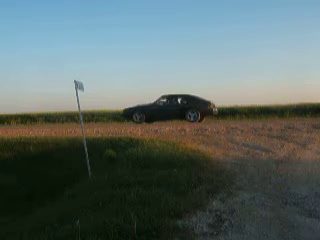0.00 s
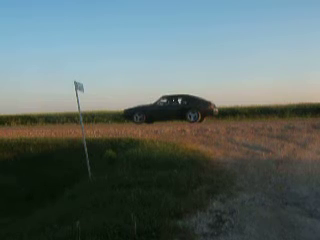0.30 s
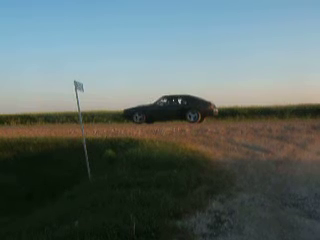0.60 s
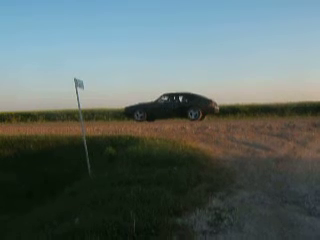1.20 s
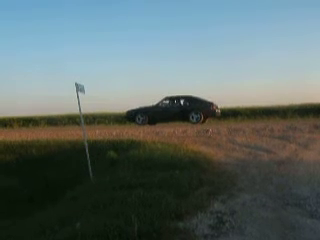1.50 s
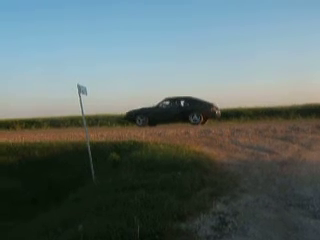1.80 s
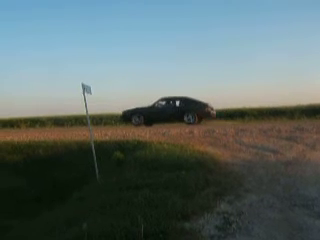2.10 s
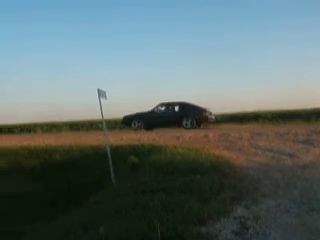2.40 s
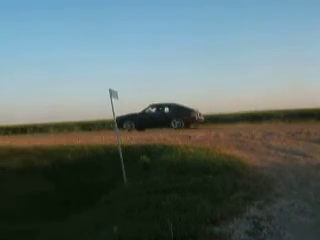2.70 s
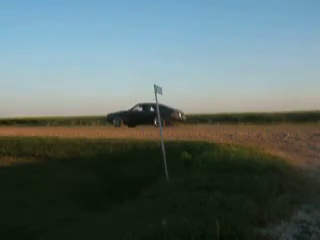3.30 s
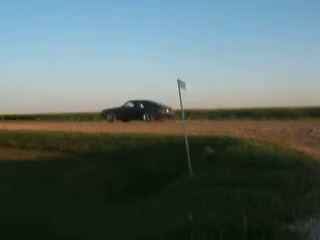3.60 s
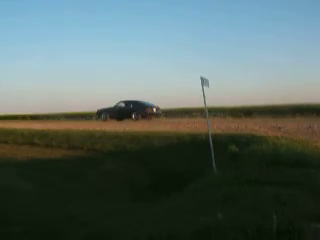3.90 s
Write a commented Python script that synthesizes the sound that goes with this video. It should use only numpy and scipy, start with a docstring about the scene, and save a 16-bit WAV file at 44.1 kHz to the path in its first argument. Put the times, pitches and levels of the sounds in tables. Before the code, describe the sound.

A car engine burbles, then roars away with spinning tyres spraying gravel and squealing.

```python
"""An engine burbles at held revs, with spits of hiss: a car about to launch on a gravel road.
It bogs as the clutch bites, then roars and climbs. Its five unequal cylinders fire into the
exhaust pipe, making a low note and a rasp. The spinning tyres spray gravel, and their slipping
rubber squeals and chirps. We listen from the verge in open country, with a few faint echoes."""
import sys
import numpy as np
from scipy import signal
from scipy.fft import rfft, irfft
from scipy.io import wavfile
from scipy.ndimage import uniform_filter1d

SR = 44100
rng = np.random.default_rng(int(sys.argv[2]) if len(sys.argv) > 2 else 0)


def output_pcm(signal):
    """Save a mono or channel-first signal as 16-bit PCM at the path in sys.argv[1].

    Samples are clipped to [-1, 1] before scaling.
    """
    pcm = np.clip(np.atleast_2d(signal).T, -1, 1) * 32767
    wavfile.write(sys.argv[1], SR, np.round(pcm).astype(np.int16))


N = 176400
T = np.arange(N) / SR

# Levels in the tables are relative; the functions add their own gains.
# engine speed, as firings per second: t/s, f/Hz
FIRING_RATE = [(0, 102.7), (.4, 103.5), (1.25, 104), (1.38, 107), (1.49, 85), (1.6, 108.4), (1.7, 119),
               (1.82, 132), (1.92, 124.4), (2.05, 109), (2.2, 135), (2.35, 138), (2.5, 148), (2.65, 161.2),
               (2.8, 175), (3, 184), (3.2, 192), (3.4, 199.8), (3.7, 207), (4, 207)]
# exhaust tones: multiple of the engine cycle rate, level/dB when held, under load, at high revs
ENGINE_TONES = [(3, -14, -2.5, -4), (4, -20, -12.5, -11), (5, -1, 3, 3.5), (6, -13, -21, -12.5),
                (7, -19.5, -9.5, -15), (8, -17, 3, -1.5), (9, -18, -10, -0.5), (10, -14.5, -1.5, -3.5),
                (11, -25, -5, -4), (12, -27, -10, -3.5), (13, -21, 1, -10.5), (14, -26, -3.5, 0),
                (15, -15.5, -2.5, -2.5), (16, -23, -3, -4.5), (17, -22, -10, -2), (18, -21.5, -3.5, -2),
                (19, -20.5, -3.5, -2.5)]
# how strong each of the five firings of a cycle is: level/dB
FIRING_LEVELS = [-1, -4, -1.5, -5.5, -3.5]
# how late each of them comes: t/s
FIRING_LAGS = [0, .0004, -.0002, .0005, -.0001]
# how loud each sound is over time: t/s, level/dB
NOTE_LEVEL = [(0, -34.5), (.06, -32.5), (.22, -33), (.27, -42), (.31, -34.5), (1.28, -32), (1.37, -29),
              (1.45, -29), (1.55, -24), (1.72, -17.5), (1.8, -20), (2.05, -26), (2.26, -27), (2.57, -25.5),
              (2.9, -28), (3.39, -25.5), (4, -26)]
RASP_LEVEL = [(0, -42.5), (1.3, -39.5), (1.6, -28.5), (1.75, -28), (2.2, -27), (2.5, -34), (2.9, -29),
              (3.25, -37), (3.73, -26), (4, -39)]
ROAR_LEVEL = [(0, -48), (1.3, -44), (1.5, -36), (1.72, -28.5), (1.88, -29), (2.1, -33), (2.3, -44),
              (2.9, -40), (4, -48)]  # swells as the clutch drags the engine down
GRAVEL_LEVEL = [(0, -49), (1.45, -48), (1.6, -39.5), (1.92, -36.5), (2.02, -25), (2.5, -27), (3, -25.5),
                (4, -27)]
HISS_LEVEL = [(0, -43.5), (.33, -48.5), (.38, -39), (.84, -38.5), (.88, -41.5), (.91, -41.5), (1.06, -38),
              (1.09, -47), (1.12, -40), (1.3, -38), (1.52, -26.5), (2.29, -29.5), (2.43, -31),
              (2.95, -29.5), (4, -29)]
# the tone colour of each sound, from bass to treble: f/Hz, level/dB
PIPE_SPECTRUM = [(55, -33), (75, -19), (94, -21), (105, -6), (122, 2), (150, -5), (205, -4.5), (260, -5.5),
                 (330, -11), (450, -10), (800, -9.5)]
RASP_SPECTRUM = [(40, -40), (90, -20), (150, -11), (220, 0.5), (310, -9.5), (450, -4), (620, 3), (750, -2),
                 (900, -2.5), (1000, -26.5), (1130, -11.5), (1350, -15.5), (1900, -17.5), (4000, -21),
                 (9000, -41.5)]
ROAR_SPECTRUM = [(50, -38), (100, -20.5), (160, -11.5), (230, 2.5), (300, -10), (400, 1), (620, -3),
                 (900, -24), (3000, -46.5)]
GRAVEL_SPECTRUM = [(40, -35), (200, -9.5), (700, -0.5), (1150, -2.5), (1400, 8), (1750, -1), (2150, -2.5),
                   (2800, -1), (3600, -1.5), (5500, -17), (7000, -26), (9000, -44.5)]
HISS_SPECTRUM = [(100, -32), (1000, -10), (1400, -2.5), (2000, -6), (3200, -4.5), (4000, 0), (5200, 1),
                 (6100, -3), (7000, -10.5), (8000, -21), (9000, -43.5)]
# the tyre squeal, and a lower howl that grows with speed: t/s, f/Hz, level/dB
SQUEAL_CURVE = [(1.85, 1650, -80), (1.98, 1600, -30.5), (2.3, 1620, -25.5), (2.55, 1560, -28),
                (2.8, 1520, -36), (2.95, 1490, -26.5), (3.25, 1480, -25.5), (3.55, 1450, -29),
                (3.8, 1430, -29.5), (4, 1400, -33)]
HOWL_CURVE = [(0, 848, -47), (.3, 858, -49.5), (.4, 856, -39), (.9, 851.6, -42), (1.3, 863, -42.5),
              (1.55, 901.6, -30), (2.7, 928, -32), (3.25, 958, -28), (4, 993.6, -25)]
# loud tyre chirps: t/s, length/s, f/Hz, fall in pitch/Hz, level/dB
TYRE_CHIRPS = [(1.963, .036, 1590, 400, -23.5), (2.12, .05, 1650, 100, -22),
               (2.328, .032, 1545, 160, -18.5), (2.365, .025, 1475, 50, -18), (2.655, .022, 1517, 0, -19.5),
               (2.897, .016, 1450, 100, -22), (2.95, .028, 1450, -100, -22), (3.088, .028, 1450, 0, -22),
               (3.152, .036, 1500, -100, -23.5), (3.215, .016, 1500, 100, -21), (3.285, .014, 1470, 0, -22),
               (3.34, .016, 1500, 0, -21), (3.403, .02, 1450, 100, -20.5), (3.525, .025, 900, 0, -22),
               (3.757, .028, 1480, 0, -23)]
# spits of hiss while the engine is held: t/s, level/dB
HISS_SPITS = [(.165, -43), (.232, -38.5), (.385, -36), (.44, -41), (0.501, -36), (.57, -40.5), (.615, -37),
              (.73, -42), (.825, -38), (.93, -35), (.98, -42.5), (1.04, -36.5), (1.12, -37), (1.205, -38),
              (1.25, -34), (1.345, -31.5), (1.445, -32)]
# echoes from the ground and field: delay/s, level/dB
FIELD_ECHOES = [(.0031, -24), (0.022, -16.5), (.051, -19)]


def exhaust_note(firing_hz, load, high_revs, waver_db=2.13, beat_hz=12.6, beat_full_s=2.89):
    """The engine's tones sweep through the pipe's resonances: loose when held, firm under load."""
    cylinders = len(FIRING_LEVELS)
    cycle_hz = firing_hz / cylinders
    cycles = turns(cycle_hz)
    beat_fade_in = np.clip((T - beat_full_s) * 10 + 1, 0, 1)
    beat_gain = from_db(-4.5 + waver_db * drift(9.6)) * beat_fade_in
    looseness = .36 + load * (.14 - .36)  # phase wobble in radians
    note = np.zeros(N)
    for multiple, held_db, loaded_db, high_db in ENGINE_TONES:
        db = held_db + load * (loaded_db - held_db) + high_revs * (high_db - loaded_db)
        gain = from_db(db + at_hz(PIPE_SPECTRUM, multiple * cycle_hz) + waver_db * drift(13))
        phase = 2 * np.pi * (multiple * cycles + rng.random()) + looseness * drift(12)
        note += gain * np.sin(phase)
        if multiple == cylinders:  # a weaker tone just above the firing note makes it throb
            note += gain * beat_gain * np.sin(phase + 2 * np.pi * beat_hz * (T - beat_full_s))
    return evened(note) * from_db(in_time(NOTE_LEVEL)[0] - 1)


def exhaust_rasp(firing_hz, rough_db=2.5, jitter_s=.00008, puff_db=2, puff_decay=1.57):
    """Each firing lets out one crack and one puff of gas, making a rasp and a deep roar."""
    fired = turns(firing_hz)
    firings = np.arange(1, int(fired[-1]))
    cylinder = firings % len(FIRING_LEVELS)
    time_chance, size_chance = rng.standard_normal((1000, 2))[firings].T
    times = np.interp(firings, fired, T) + np.array(FIRING_LAGS)[cylinder] + jitter_s * time_chance
    strength = from_db(np.array(FIRING_LEVELS)[cylinder] + rough_db * size_chance)
    cracks = np.bincount(np.clip((times * SR).astype(int), 0, N - 1), strength, N)
    puff_shape = np.exp(-puff_decay * (fired % 1)) * np.interp(T, times, strength)
    puffs = rng.standard_normal(N) * puff_shape
    gas = rms_one(cracks) + from_db(puff_db) * rms_one(puffs)
    rasp = evened(coloured(gas, RASP_SPECTRUM)) * from_db(in_time(RASP_LEVEL)[0] + .5)
    roar = evened(coloured(gas, ROAR_SPECTRUM)) * from_db(in_time(ROAR_LEVEL)[0])
    return rasp + roar


def gravel(dust_db=1, clump_db=.94):
    """The spinning tyres throw stones, in clumps over a wash of dust."""
    spray = clicks(per_s=1800, spread_db=2.5) + from_db(dust_db) * rng.standard_normal(N)
    db = in_time(GRAVEL_LEVEL)[0] + clump_db * drift(30)
    return rms_one(coloured(spray, GRAVEL_SPECTRUM)) * from_db(db)


def tyre_squeal(flutter_db=3.5, wander_hz=45, howl_wander_hz=40):
    """Slipping rubber sings roughly, above a lower wandering howl."""
    hz, db = in_time(SQUEAL_CURVE)
    squeal = ringing(hz + wander_hz * drift(15), width_hz=210)
    squeal *= from_db(db - 3.5 + flutter_db * drift(22))
    hz, db = in_time(HOWL_CURVE)
    howl = ringing(hz + howl_wander_hz * drift(50.75), width_hz=77) * from_db(db)
    return squeal + howl


def tyre_chirps(wobble_hz=28, octave_db=-12):
    """The rubber briefly locks into a rough, sliding tone, with a softer one an octave up."""
    chirps = np.zeros(N)
    wobble = wobble_hz * drift(150)
    for start, length, hz, fall_hz, db in TYRE_CHIRPS:
        on = (T > start) & (T < start + length)
        progress = (T[on] - start) / length
        phase = 2 * np.pi * turns(hz - fall_hz * (progress - .5) + wobble[on])
        swell = np.sqrt(2 * np.abs(np.sin(np.pi * progress)))
        chirps[on] += swell * from_db(db) * (np.sin(phase) + from_db(octave_db) * np.sin(2 * phase))
    return chirps


def hiss(flicker_db=.88, spit_width_s=.012):
    """Air and fine grit rush brightly, with briefly ringing flecks and early spits of hiss."""
    rush = rng.standard_normal(N) + from_db(-2) * clicks(per_s=2000, spread_db=2)
    flecks = rms_one(sum(ringing(np.full(N, hz), width_hz=110) * from_db(3.5 * drift(25))
                         for hz in np.geomspace(4100, 6100, num=12)))
    air = rms_one(rms_one(coloured(rush, HISS_SPECTRUM)) + from_db(-7) * flecks)
    ticks = rms_one(coloured(clicks(per_s=4000, spread_db=2), HISS_SPECTRUM))
    grit = rms_one(ticks + from_db(-5) * flecks)
    spits = sum(from_db(db) * np.exp(-((T - s) / spit_width_s) ** 2) for s, db in HISS_SPITS)
    return air * from_db(in_time(HISS_LEVEL)[0] + flicker_db * drift(40)) + grit * spits


def thump(start_s=2.021, hz=70, db=-19, decay_s=.0035):
    """One soft, low thump."""
    age = np.maximum(T - start_s, 0)
    return from_db(db) * np.sin(2 * np.pi * hz * age) * np.exp(-age / decay_s)


def echoes(sound):
    """The ground and field send back faint, late copies of a sound."""
    return sum(from_db(db) * np.interp(T - delay, T, sound, left=0) for delay, db in FIELD_ECHOES)


def from_db(db):
    """Turn decibels into a gain to multiply by."""
    return 10 ** (np.asarray(db) / 20)


def rms_one(x):
    """Scale to an average power of 1."""
    return x / np.sqrt(np.mean(x ** 2) + 1e-20)


def evened(x, size=6000):
    """Even out slow swells, holding the power near 1."""
    return x / np.sqrt(np.abs(uniform_filter1d(x * x, size)) + 1e-12)


def in_time(rows):
    """Join a table's points into one curve over time per column."""
    times, *columns = np.transpose(rows)
    return [np.interp(T, times, column) for column in columns]


def at_hz(spectrum, hz):
    """Look up a spectrum's level in dB at a frequency."""
    f, db = np.transpose(spectrum)
    return np.interp(np.log(hz + 1e-9), np.log(f), db)


def drift(rate_hz, step=40):
    """A smooth random wobble with a typical size of 1."""
    pole = np.exp(-2 * np.pi * rate_hz * step / SR)
    noise = rng.standard_normal(N // step + 2002)
    slow = signal.lfilter([1], [1, -2 * pole, pole * pole], noise)[2000:]  # let the filter settle
    return np.interp(np.arange(N) / step, np.arange(len(slow)), rms_one(slow))


def coloured(x, spectrum, size=4096):
    """Filter a sound to give it a tone colour."""
    bins_hz = np.arange(size // 2 + 1) * SR / size
    cepstrum = irfft(np.log(from_db(at_hz(spectrum, bins_hz))))
    # folding makes the filter ring after a click, never before it
    cepstrum[1:size // 2] *= 2
    cepstrum[size // 2 + 1:] = 0
    return signal.fftconvolve(x, irfft(np.exp(rfft(cepstrum))))[:N]


def turns(hz):
    """Count the cycles completed at a changing rate."""
    return np.cumsum(hz) / SR


def clicks(per_s, spread_db):
    """Random clicks of uneven size."""
    sizes = from_db(spread_db * np.minimum(rng.exponential(1, N), 5)) * rng.choice([-1, 1], N)
    return rms_one(sizes * (rng.random(N) < per_s / SR))


def ringing(hz, width_hz):
    """A randomly shaken tone: the wider it is, the noisier it sounds."""
    phase = 2 * np.pi * turns(hz)
    return rms_one(drift(width_hz) * np.cos(phase) + drift(width_hz) * np.sin(phase))


def scene(clutch_s=1.48, bite_s=.128, high_revs_from_s=2.603, climb_s=.9):
    """Mix the engine, tyres, hiss, thump and echoes into one channel."""
    load = np.clip((T - clutch_s) / bite_s + .5, 0, 1)
    high_revs = np.clip((T - high_revs_from_s) / climb_s, 0, 1)
    firing_hz = in_time(FIRING_RATE)[0] * (1 + .002 * drift(10))
    note = exhaust_note(firing_hz, load, high_revs)
    rasp = exhaust_rasp(firing_hz) * from_db(-4 * high_revs)  # cleaner as the revs climb
    noises = rasp + gravel() + tyre_squeal() + tyre_chirps() + hiss()
    return (note + noises + thump() + echoes(noises))[None]


def record(dry, stop_hz=9600):
    """Cut away the highest treble steeply."""
    return signal.sosfilt(signal.cheby2(16, 70, stop_hz, fs=SR, output="sos"), dry)


dry = scene()
out = record(dry)
output_pcm(out)
```